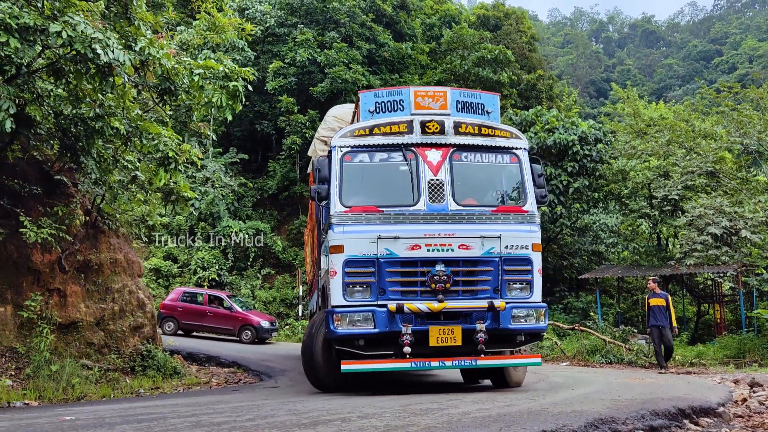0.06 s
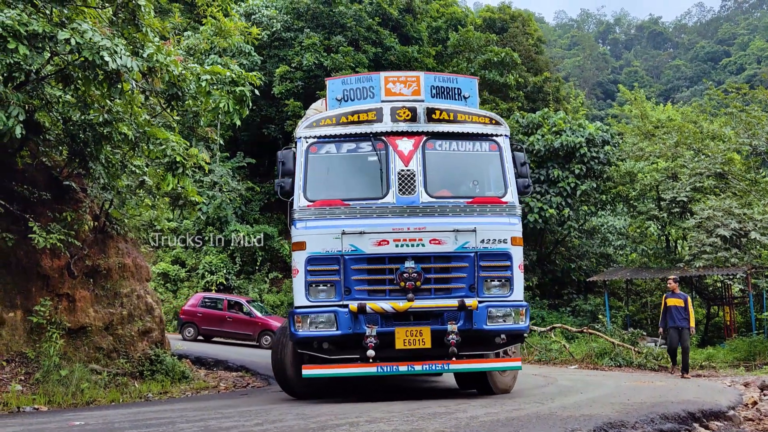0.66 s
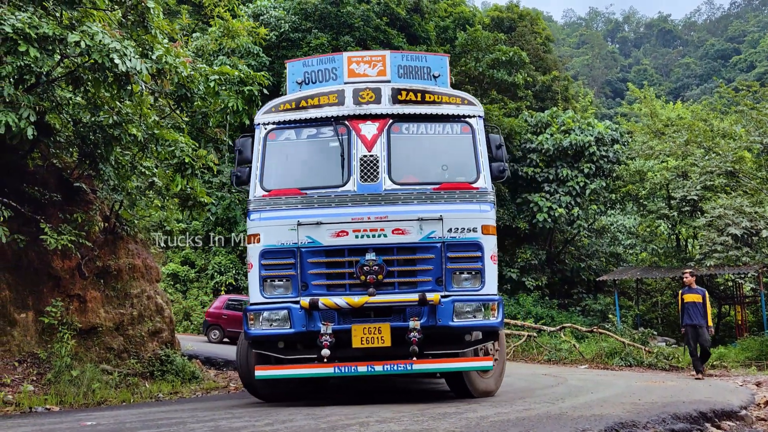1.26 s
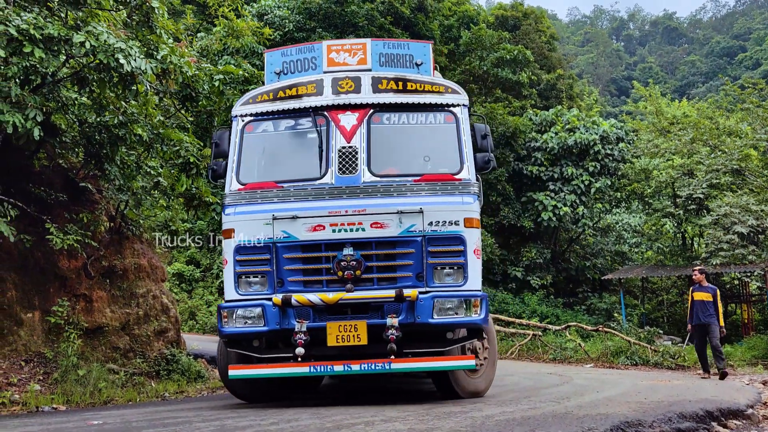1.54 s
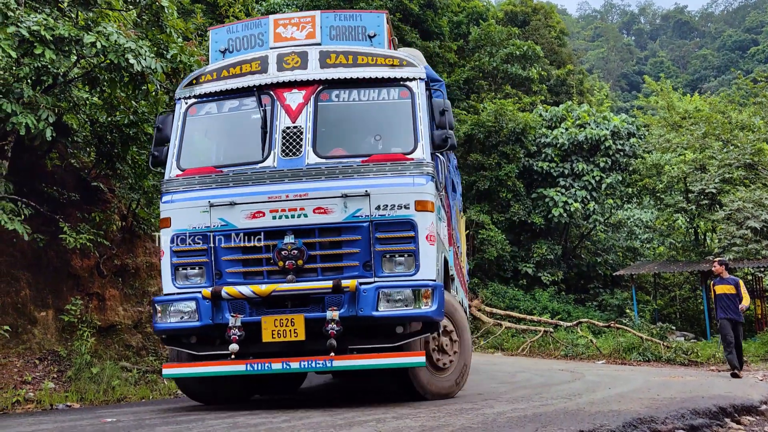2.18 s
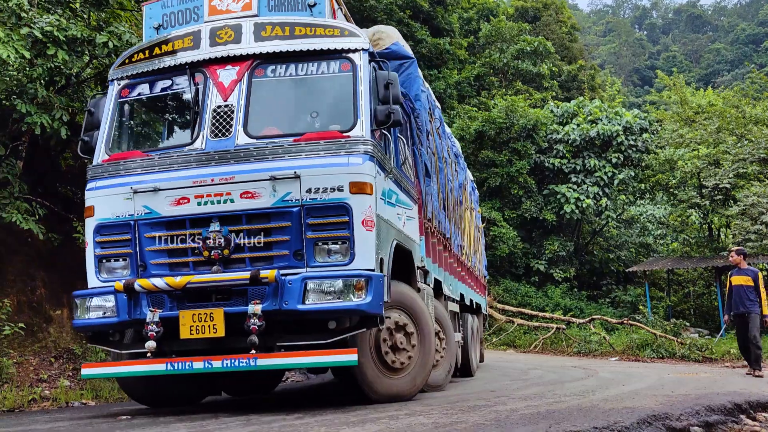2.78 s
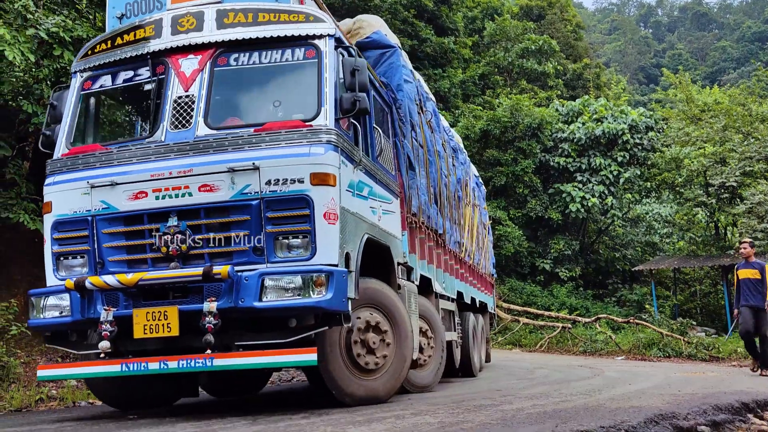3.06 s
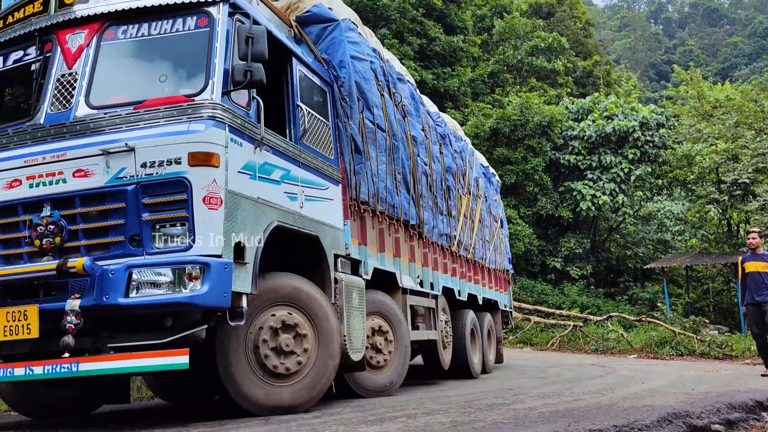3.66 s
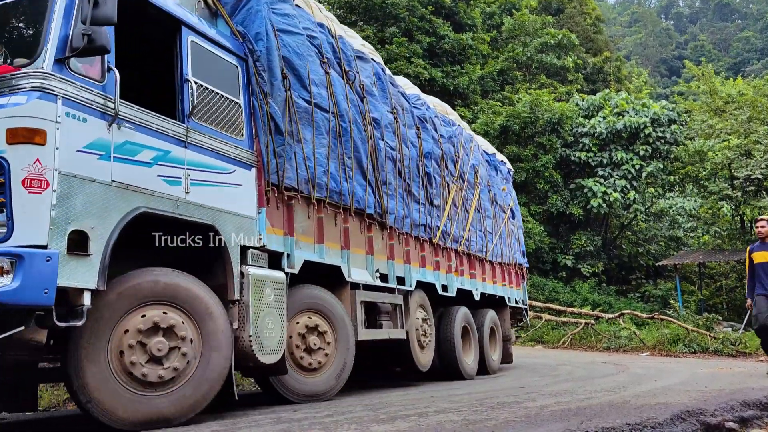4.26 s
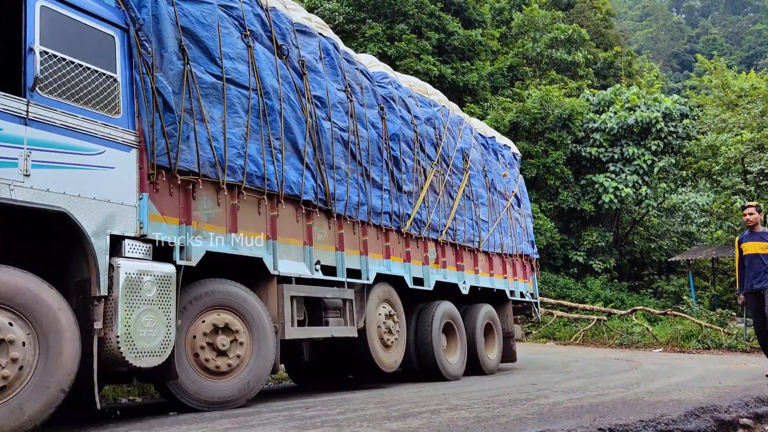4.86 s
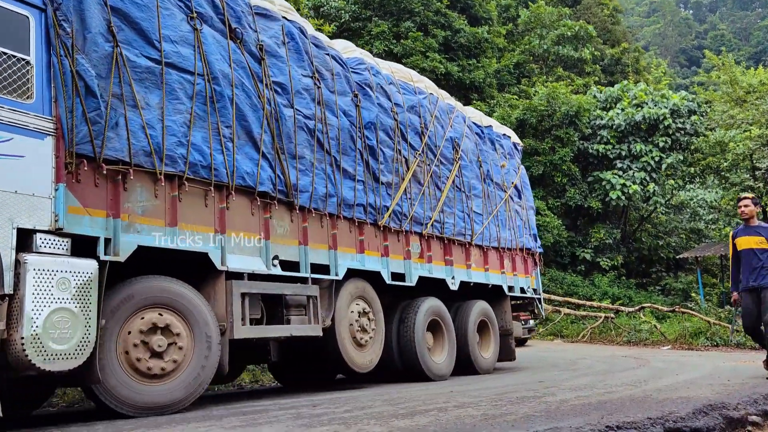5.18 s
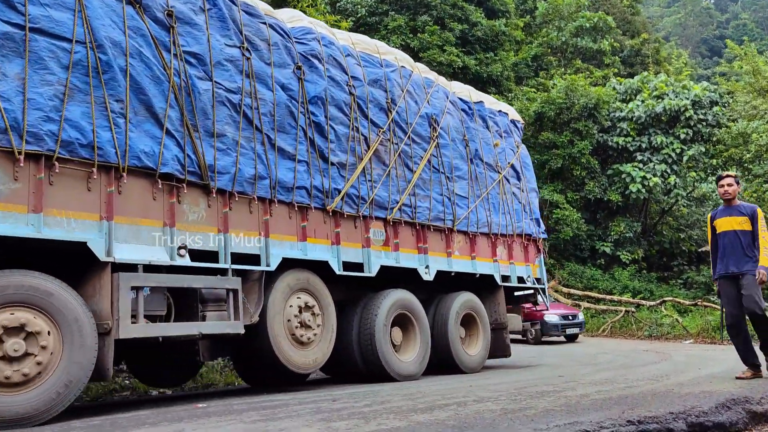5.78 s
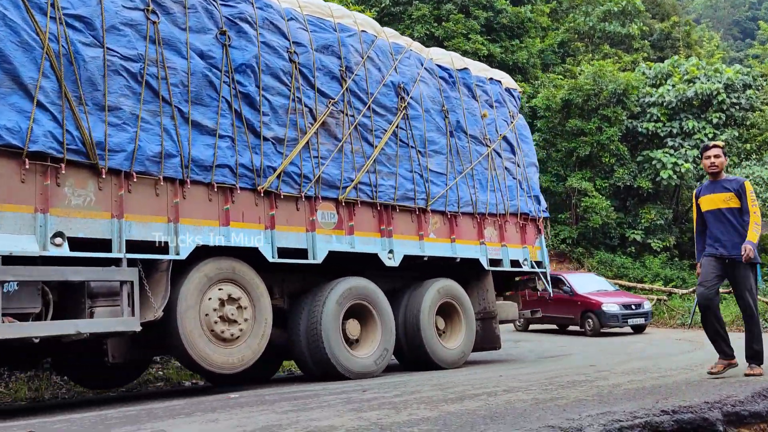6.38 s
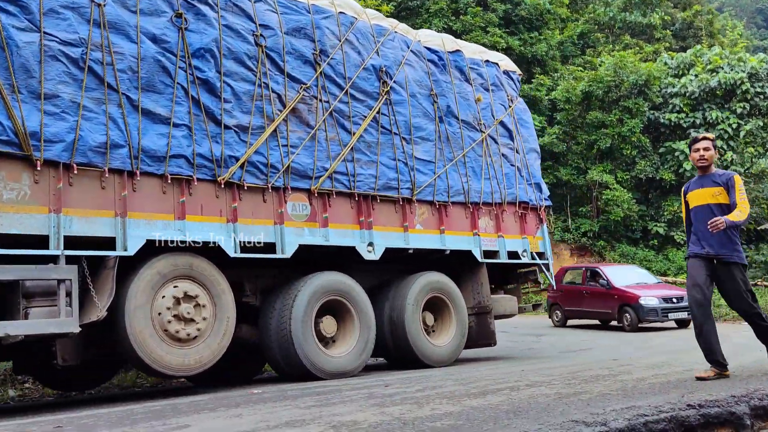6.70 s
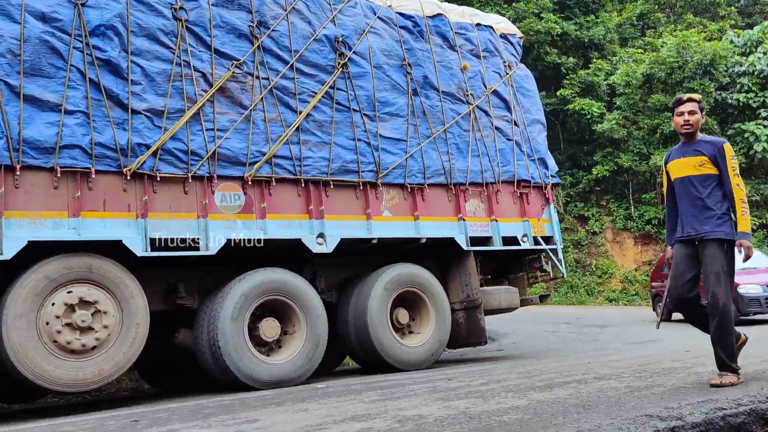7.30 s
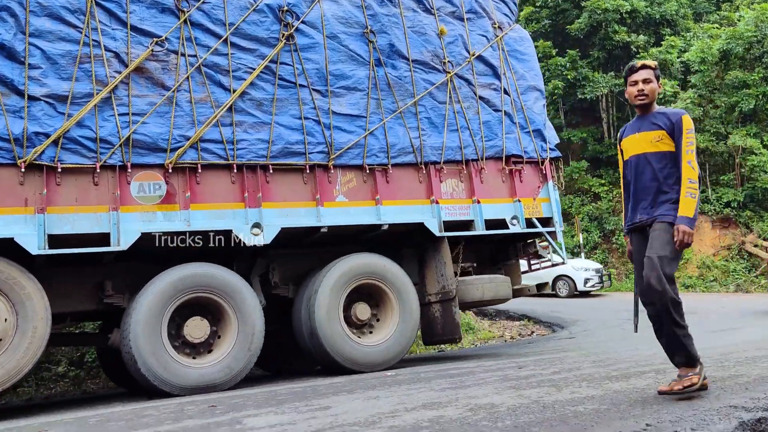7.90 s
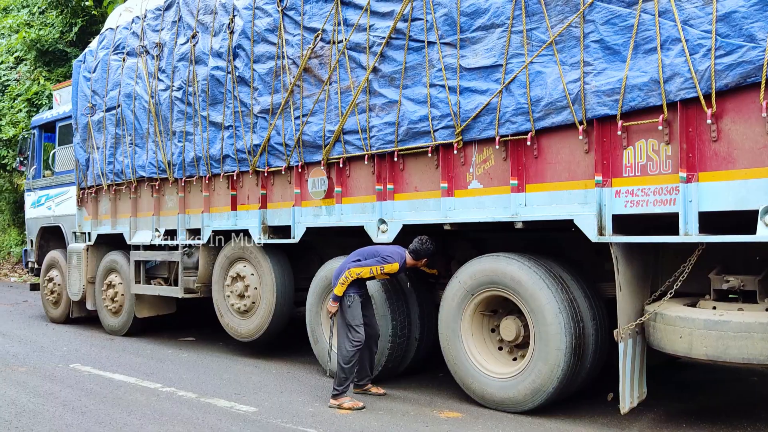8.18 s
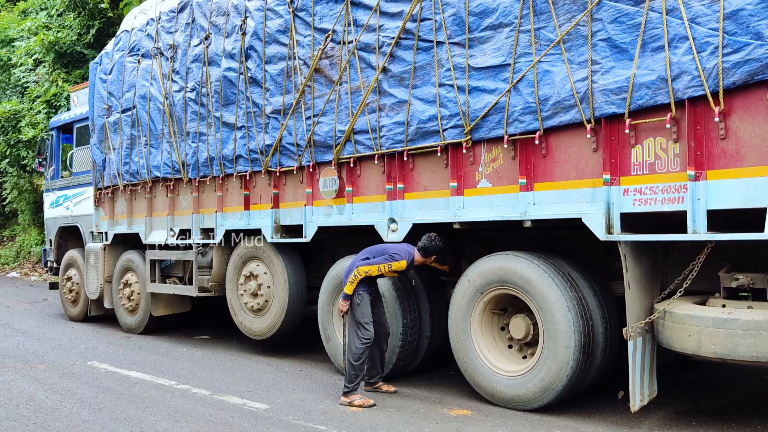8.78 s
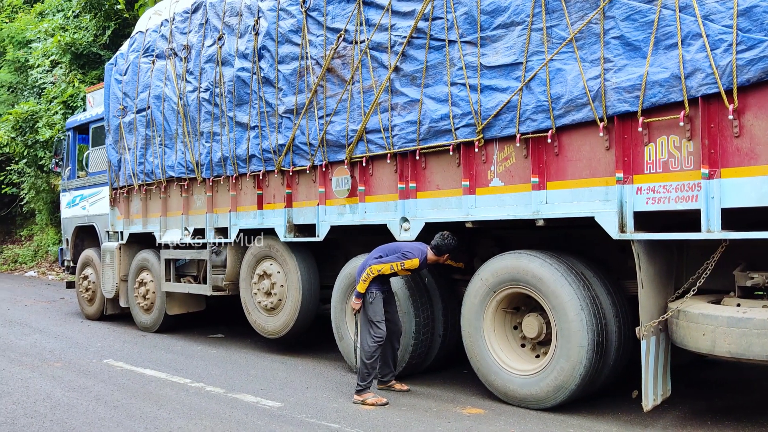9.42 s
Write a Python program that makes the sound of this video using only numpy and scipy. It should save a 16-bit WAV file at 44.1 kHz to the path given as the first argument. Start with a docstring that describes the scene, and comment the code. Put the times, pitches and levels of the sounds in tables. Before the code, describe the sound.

A laden diesel lorry crawls close by on a hill road, its exhaust throbbing and its engine clattering at a steady idle speed. It grows louder as it nears, while air hisses on the left and dragging brakes give thin, very high squeals. After about eight seconds the sound cuts to the lorry standing, heard from behind, idling more quietly. A short two-tone horn toots on the right and echoes off the hillside.

```python
"""Diesel lorry on a hairpin bend

A laden six-cylinder lorry crawls close by at idle speed. Its firings make the exhaust throb and
the engine clatter, and the air compressor chuffs. Air hisses on the left, while dragging brakes
make their drums squeal thinly. Then, all at once, the lorry is heard from behind, standing and
idling, and a two-tone horn toots further along the hill."""
import sys
import numpy as np
from scipy import signal
from scipy.fft import rfft, irfft, next_fast_len
from scipy.io import wavfile
from scipy.ndimage import uniform_filter1d, minimum_filter1d

SR = 44100
rng = np.random.default_rng(int(sys.argv[2]) if len(sys.argv) > 2 else 0)


def dump_mix(stems):
    """Bounce the given channels to the path in sys.argv[1] as a 16-bit WAV at rate SR."""
    frames = np.atleast_2d(stems).T  # one column per channel
    limited = np.clip(frames, -1, 1)  # hard clip at full scale
    pcm = np.round(limited * 32767).astype(np.int16)
    wavfile.write(sys.argv[1], SR, pcm)


N = 416744
T = np.arange(N) / SR
CYLINDERS = 6  # each fires once in an engine cycle
SIDE_ON = np.clip((T - 1.8) / 4.66, 0, 1)  # 0: the lorry faces us, 1: it has turned its side to us

# How often the engine fires: t/s, rate/Hz
FIRING_RATE = [(0.0, 37.54), (2.2, 37.71), (3.5, 37.44), (5.4, 37.58), (6.3, 37.33), (7.6, 37.28),
               (8.1, 38.09), (8.6, 37.19), (9.45, 37.7)]
# Tone colour of the low rumble: f/Hz, relative level/dB
RUMBLE_COLOUR = [(22, -15), (40, 0.5), (70, 3.5), (110, -3), (145, -3.5), (195, 2), (250, -7.5),
                 (320, -14.5), (500, -53)]
# How far to the left the moving lorry sounds: f/Hz, left minus right/dB
ROLLING_BALANCE = [(100, 0), (300, 0), (600, 0), (1100, 3.5), (2000, 7), (2900, 7.5), (4000, 20),
                   (6000, 27), (9000, 36.5)]


def rolling():
    """The lorry creeps past, each part growing louder as it comes near."""
    # Tones of the exhaust and body: multiple of the cycle rate, relative level/dB
    tones = [(4, -24), (16, -6), (20, -8.5), (23, -21), (30, -3), (33, -24), (34, -8.5), (36, -7.5),
             (38, -9.5)]
    # How much sooner the engine and tyres are heard on the right: t/s, lead/s
    right_lead = [(0, -.00009), (2.7, 0), (5, .0001), (6.5, .00027), (8, .00027)]
    drone = exhaust(tones, thump_at=0.477, scatter=0.6, rough=0.05)
    throb = chug() * amp(-8.5) + thump() * amp(-0.2) + drone * amp(-5) + side_drone() * amp(-8)
    rumble = noise(RUMBLE_COLOUR, ROLLING_BALANCE) * amp(-7.5)
    bass = (throb + rumble) * passing(nearest_s=3.87, distance_m=5.1, db=-31)
    bass += boom() * passing(nearest_s=5.2, distance_m=3.3, db=-30.5)
    left, right = bass + tyres() + compressor() + clatter() + engine_block() + belt_whine()
    right = np.interp(T + curve(right_lead), T, right)
    return np.array([left, right]) + air() + brakes()


def standing():
    """The idling lorry from behind: a boom, soft clatter and a faint leak of air."""
    # Tones of the exhaust: multiple of the cycle rate, relative level/dB
    tones = [(5, -14), (7, -15), (9, -24), (10, -14), (12, -9.5), (15, -14), (16, -25), (24, -17),
             (26, -11), (27, -9.5), (28, -15), (30, -7.5), (31, -14), (36, -15), (37, -9.5), (38, -14),
             (39, -22), (40, -11)]
    # Tone colours of the clatter and the leak: f/Hz, relative level/dB
    rattle_colour = [(150, -23), (260, -5.5), (396, -9), (439, -7), (545, -15.5), (731, -9.5), (1030, -9.5),
                     (1300, -9.5), (1590, -16), (2280, -16.5), (2460, -9), (3520, -20.5), (5090, -33),
                     (7150, -56), (12100, -120)]
    leak_colour = [(3000, -27), (4500, -0.5), (5800, -6), (6800, -2), (7500, 2.5), (8600, 3.5),
                   (9500, -4.5), (11000, -11), (14300, -13)]
    # Which side the noises lean to: f/Hz, left minus right/dB
    balance = [(300, -2.5), (600, 3.5), (1100, -2.5), (2000, -3.5), (3000, -12), (5000, -6), (8500, -24),
               (14000, -2)]
    bass = boom() * amp(-35) + exhaust(tones, thump_at=0.45, scatter=0.98, rough=0.25) * amp(-40)
    rumble = noise(RUMBLE_COLOUR, balance) * amp(-43)
    rattle = noise(rattle_colour, balance) * knocking(depth=0.48, decay=0.48) * amp(-41.5)
    leak = noise(leak_colour, balance) * amp(-44)
    return bass + rumble + rattle + leak


def firings():
    """The engine's clock: it counts up by one each time a cylinder fires."""
    return np.cumsum(curve(FIRING_RATE)) / SR + 0.31


def boom():
    """The firings follow each other so fast that they make one deep tone."""
    return unit_level(np.cos(2 * np.pi * firings()))


def exhaust(tones, thump_at, scatter, rough, weak_db=-27):
    """Strong tones line up in a thump, as one cylinder beats harder; weak ones fill in the drone."""
    cycle = firings() / CYLINDERS - thump_at
    strong, drone = dict(tones), np.zeros(N)
    for multiple in range(min(strong), max(strong) + 1):
        if multiple != CYLINDERS:  # boom() plays that tone
            phase = (scatter if multiple in strong else 2 * np.pi) * rng.standard_normal()
            drone += amp(strong.get(multiple, weak_db)) * np.cos(2 * np.pi * multiple * cycle + phase)
    return unit_level(drone * (1 + rough * wander(22)))


def chug(weak_share=0.32, scatter_db=1.5):
    """Strong and weak blasts from the engine's two halves take turns to ring the exhaust pipe."""
    # Notes of the pipe: f/Hz, width/Hz, relative level/dB, sign
    pipe_notes = [(54, 27, 0.5, 1), (107, 42, -2, -1), (177.3, 35, -1, 1)]
    count = firings() - 0.26
    blasts = clicks(count) * np.where(count % 2 < 1, 1, weak_share)
    blasts *= amp(scatter_db * rng.standard_normal(N))
    ring = sum(sign * amp(db) * resonate(blasts, hz, width) for hz, width, db, sign in pipe_notes)
    return unit_level(ring)


def thump(ring_hz=203, length_s=0.0048, tail_s=0.02, front_db=-3):
    """Once a cycle, a harder beat rings the silencer; from the front the cab shields it."""
    since_s = ((firings() + 0.14) % CYLINDERS - 3) / curve(FIRING_RATE)
    beat = np.exp(-(since_s / length_s) ** 2)
    tail = 0.11 * (since_s > 0) * np.exp(-abs(since_s) / tail_s)
    shielding = amp(front_db * (1 - np.sqrt(SIDE_ON)))
    return np.maximum(beat, tail) * np.cos(2 * np.pi * ring_hz * since_s) * shielding


def side_drone():
    """Low tones spread from under the load bed as the lorry turns its side to us."""
    # Tones of the drone: multiple of the cycle rate, relative level/dB
    tones = [(20, -4), (24, 1), (27, -2.5)]
    cycle = firings() / CYLINDERS
    drone = sum(amp(db) * np.cos(2 * np.pi * (multiple * cycle + rng.random())) for multiple, db in tones)
    return SIDE_ON * unit_level(drone)


def knocking(depth, decay):
    """A level that jumps at each firing, then fades; decay is a share of the gap between firings."""
    # Knock of each cylinder, in firing order: relative level/dB
    knock_db = [1, -1.5, 4, -1, -1, 4.5]
    count = firings() + 0.067
    strength = amp(np.take(knock_db, count.astype(int), mode="wrap"))
    bursts = strength * np.exp(-(count % 1) / decay)
    return unit_level(1 + depth * uniform_filter1d(bursts, size=240))


def clatter(grain_db=-0.1, surge_db=1.32):
    """The knocks of burning fuel rattle the engine's casing."""
    # Tone colour of the casing from the front and the side: f/Hz, relative level/dB
    front_colour = [(290, -7), (350, -4), (520, -2), (620, 0), (780, -3), (950, -3), (1200, 2),
                    (1330, -8.5), (1600, 1), (2200, -1), (2750, -1), (3100, -2.5), (3900, -12.5)]
    side_colour = [(290, -3.5), (350, -3.5), (460, -1), (620, 2.5), (850, 1), (1150, 6), (1400, 3.5),
                   (1620, 3.5), (2200, -2), (2800, 2.5), (3300, -3), (4200, -15)]
    uneven = amp(grain_db * np.tanh(wander(240)) + surge_db * wander(25))
    rattle = turning(front_colour, side_colour) * knocking(depth=0.51, decay=0.6)
    return rattle * uneven * passing(nearest_s=5.16, distance_m=3.88, db=-34.5)


def engine_block(scatter_db=1.5, rattle_db=4):
    """Each firing strikes the metal block a sharp blow, and loose parts rattle after it."""
    # Notes of the block: f/Hz, width/Hz, relative level from the front/dB, from the side/dB
    block_notes = [(1029, 64, 2.5, 2.5), (1115, 73, 1.5, 4), (1191, 84, -3.5, 5), (1530, 270, 0, 0),
                   (2730, 230, -2, -14)]
    blows = clicks(firings() + 0.09) * amp(scatter_db * rng.standard_normal(N))
    rattle = noise([(500, 0), (2500, 0)], ROLLING_BALANCE) * knocking(depth=0.92, decay=0.21)
    out = np.zeros((2, N))
    for hz, width, front_db, side_db in block_notes:
        struck = unit_level(resonate(blows * np.sign(rng.standard_normal(N)), hz, width))
        shaken = unit_level(resonate(rattle, hz, width))
        ring = pan(at_pitch(ROLLING_BALANCE, hz)) * struck + amp(rattle_db) * shaken
        out += amp(front_db + (side_db - front_db) * SIDE_ON) * ring
    return unit_level(out) * passing(nearest_s=2.76, distance_m=2.2, db=-38)


def compressor(ring_hz=454, width_hz=23, rough=0.28, hum_multiple=37):
    """One gulp of air per engine turn rings the intake pipe; a hum carries on along the side."""
    # The intake swings away: front level/dB, hidden level/dB, halfway t/s, time taken/s
    intake_swing = (-41.5, -57.5, 2.45, 1.8)
    front_db, hidden_db, halfway_s, taken_s = intake_swing
    hidden = np.clip((T - halfway_s) / taken_s + 0.5, 0, 1)
    turns = firings() / (CYLINDERS / 2) + 0.3
    puffs = np.exp(-(turns % 1)) * rng.standard_normal(N)
    ring = unit_level(resonate(clicks(turns), ring_hz, width_hz))
    breath = unit_level(resonate(puffs, ring_hz, 2 * width_hz))
    chuff = unit_level(ring + rough * breath) * amp(front_db + (hidden_db - front_db) * hidden)
    hum = unit_level(np.sin(2 * np.pi * hum_multiple * turns))
    return pan(3.8) * (chuff + hum * passing(nearest_s=4.9, distance_m=1, db=-53))


def air(flutter_db=1.45, grain_db=0.5):
    """Air hisses under the lorry, fluttering a little and now and then spitting."""
    # Tone colours of the hiss (front, side) and the high sizzle: f/Hz, relative level/dB
    front_colour = [(2500, -22), (3300, -2), (4000, -1.5), (4600, 2), (5000, 1.5), (5900, 4), (6800, 0),
                    (7500, 2), (8300, -2), (9200, 0), (11000, -5), (14000, -5.5)]
    side_colour = [(2200, -14.5), (3200, -5.5), (4350, 0.5), (4600, 2.5), (4900, -4), (5900, 2), (6800, -1),
                   (7500, 2), (8300, 2.5), (9500, 4.5), (11000, -0.5), (14000, -46)]
    sizzle_colour = [(8500, -29), (9300, -7), (9900, 7.5), (11200, 7.5), (12300, 3), (13200, -2),
                     (14300, -7.5)]
    # Loudness of the sizzle: t/s, level/dB
    sizzle_level = [(0, -32.5), (.6, -35.5), (.8, -31), (1.15, -35), (2, -31), (2.5, -34), (3.5, -33),
                    (4.4, -35.5), (5.7, -38.5), (7.3, -34.5), (8, -35)]
    # Spits of air: t/s, level/dB, fade time/s
    spit_list = [(0.415, -30, 0.0092), (1.899, -31, 0.0035), (3.966, -24, 0.024), (4.97, -23.5, 0.027),
                 (5.812, -23, 0.0078), (5.97, -24, 0.033)]
    hiss = turning(front_colour, side_colour) * knocking(depth=0.36, decay=0.31)
    hiss *= passing(nearest_s=6.73, distance_m=3.07, db=-28)
    sizzle = noise(sizzle_colour, ROLLING_BALANCE) * amp(curve(sizzle_level))
    spits = sum(amp(db) * (T > start) * np.exp(-abs(T - start) / fade) for start, db, fade in spit_list)
    spray = noise([(3000, 4.8), (6000, 7.1), (14000, 2.0)], ROLLING_BALANCE)
    flutter = amp(flutter_db * wander(22.7) + grain_db * wander(270))
    return (hiss + sizzle) * flutter + spits * spray


def brakes(waver_hz=24, flutter_db=5.5, sag_hz=70, rasp=0.1, grit=0.12, gain_db=-1.5, echo_db=-11):
    """Dragging linings ring one high note of the drums after another; each sags at its loudest."""
    # Squeals: t/s, length/s, loudest point/share of length, f/Hz, glide/Hz, relative level/dB
    squeals = [(0.48, 0.085, 0.5, 12700, 352, -27), (0.72, 0.16, 0.63, 10270, 26, -17),
               (0.77, 0.27, 0.21, 9600, -92, -23), (1, 0.08, 0.5, 11230, -50, -22),
               (1.34, 0.11, 0.45, 13420, 30, -29), (1.78, 0.076, 0.69, 12400, 350, -20),
               (1.8, 0.16, 0.73, 10590, -120, -12), (1.97, 0.2, 0.43, 10620, -120, -10.5),
               (2.34, 0.18, 0.5, 13990, 20, -28), (3.01, 0.23, 0.58, 8640, 70, -26.5),
               (3.17, 0.16, 0.3, 14000, -10, -28.0), (3.2, 0.23, 0.37, 9470, 50, -27),
               (3.48, 0.071, 0.44, 12400, 350, -12), (3.57, 0.05, 0.4, 14000, -290, -20),
               (3.61, 0.15, 0.93, 13750, -40, -18), (4.4, 0.098, 0.36, 12450, 220, -11),
               (4.42, 0.18, 0.64, 13000, -220, -18), (4.56, 0.071, 0.88, 12750, 154, -6),
               (4.65, 0.1, 0.18, 13730, 20, -18), (4.78, 0.26, 0.44, 9650, -100, -20.5),
               (5.44, 0.084, 0.26, 12230, 172, -12), (5.46, 0.17, 0.72, 9180, 124, -21.5),
               (5.485, 0.045, 0.36, 12740, 353, -16), (5.51, 0.055, 0.3, 13540, 20, -19),
               (5.565, 0.048, 0.8, 14100, -350, -15), (5.6, 0.087, 0.65, 13800, -7, -6),
               (5.61, 0.075, 0.49, 13200, 40, -16), (5.67, 0.22, 0.69, 9500, 200, -30),
               (5.79, 0.046, 0.5, 8650, -58, -22.5), (5.85, 0.13, 0.65, 9860, -130, -18),
               (6.26, 0.045, 0.5, 12170, 40, -9), (6.32, 0.11, 0.4, 13180, 248, -21),
               (6.38, 0.07, 0.87, 13890, 100, -22), (6.38, 0.11, 0.18, 9180, 132, -18.5),
               (6.445, 0.064, 0.3, 13600, -130, -11.0), (6.48, 0.12, 0.7, 9450, 280, -22),
               (6.57, 0.065, 0.74, 8750, 40, -15), (6.66, 0.11, 0.4, 9840, 68, -20),
               (7.05, 0.15, 0.5, 12610, -250, -24), (7.07, 0.096, 0.42, 9990, 40, -19),
               (7.19, 0.067, 0.46, 10680, 70, -20), (7.2, 0.06, 0.45, 9780, 60, -15),
               (7.22, 0.084, 0.36, 9960, 170, -17), (7.26, 0.07, 0.5, 9350, -120, -22),
               (7.41, 0.071, 0.6, 9550, 60, -20), (7.24, 0.14, 0.6, 13940, -120, -28),
               (7.36, 0.085, 0.4, 13220, 350, -22.5), (7.4, 0.12, 0.46, 13880, 350, -25),
               (7.53, 0.22, 0.22, 9950, -360, -19), (7.79, 0.07, 0.3, 12600, 352, -24.5),
               (7.93, 0.07, 0.5, 12520, 23, -25), (7.96, 0.05, 0.8, 9800, 15, -14.5)]
    out = singing_brake()
    waver, grip, scrape, grains = wander(39), wander(58), wander(310), wander(900)
    for start, length, peak, centre_hz, glide_hz, db in squeals + nearby_notes(squeals):
        now = np.flatnonzero((T > start) & (T < start + length))
        own = (now + rng.integers(N)) % N  # each squeal gets its own stretch of the wobbles
        progress = (T[now] - start) / length
        swell = np.sqrt(np.interp(progress, [0, peak, 1], [0, 1, 0]))
        hz = centre_hz + glide_hz * (progress - 0.5) + sag_hz * (0.8 - swell) + waver_hz * waver[own]
        tone = np.sqrt(2) * np.sin(2 * np.pi * np.cumsum(hz) / SR + rasp * scrape[own])
        ragged = 1 + grit * grains[own]
        out[now] += amp(db + gain_db + flutter_db * np.tanh(grip[own])) * swell * ragged * tone
    echo = amp(echo_db) * hillside(out, fade_s=0.38)
    return out * amp([[0], [-31]]) + echo * amp([[0], [-21]])  # both far to the left


def nearby_notes(squeals, spread_hz=520, weaker_db=-11, length_s=0.052):
    """Somewhere along the way, each squeal briefly wakes a nearby note of the brake drum."""
    chances = rng.random((len(squeals), 2))
    return [(start + when * length, length_s, 0.5, hz + spread_hz * (2 * pitch - 1), 0, db + weaker_db)
            for (start, length, _, hz, _, db), (when, pitch) in zip(squeals, chances)]


def singing_brake(waver_hz=36, flutter_db=7, gain_db=-1, fade_s=0.046):
    """One lining sings a thin, unsteady note that sags and climbs as the drum goes round."""
    # Path of the note: t/s, f/Hz, relative level/dB
    note = [(0.18, 9840, -41), (0.53, 10040, -38), (0.77, 9750, -30), (1.07, 9280, -37),
            (1.38, 9130, -27.5), (1.91, 10130, -35), (2.24, 9950, -25.5), (2.42, 10009, -31)]
    fade = np.clip(np.minimum(T - note[0][0], note[-1][0] - T) / fade_s, 0, 1)
    hz = curve(note) + waver_hz * wander(51)
    tone = np.sqrt(2) * np.sin(2 * np.pi * np.cumsum(hz) / SR)
    return fade * tone * amp(curve(note, column=2) + gain_db + flutter_db * np.tanh(wander(47)))


def frame_knocks(width_share=0.42, rattle_db=-15):
    """The lorry's frame gives dry cracks, each followed by a short rattle."""
    # Knocks: t/s, peak level/dB, f/Hz, fade time/s, left minus right/dB
    knock_list = [(2.77, -20, 2110, .005, 9), (2.896, -14, 5500, 0.003, 22), (2.901, -12, 6500, 0.004, 26),
                  (2.907, -19, 2400, 0.004, 10), (7.7052, -15.5, 1300, 0.011, 5),
                  (8.522, -23.5, 6540, 0.025, -15)]
    out = np.zeros((2, N))
    for start, db, hz, fade_s, side_db in knock_list:
        crack = resonate(clicks(1.0 * (T > start)), hz, width_share * hz)
        rattle = unit_level(resonate(rng.standard_normal(N), hz, width_share * hz))
        rattle *= (T > start) * np.exp(-abs(T - start) / fade_s)
        out += pan(side_db) * amp(db) * (crack / abs(crack).max() + amp(rattle_db) * rattle)
    return out


def horn(bell_hz=2800, bell_width_hz=80, swell_s=0.022, rasp=0.15, echo_delay_s=0.06):
    """A short, raspy toot from a moving vehicle; the hill throws it back blurred and a bit higher."""
    # The horn's two notes and their overtones: f/Hz, relative level/dB
    tones = [(350, -44), (403, -46), (2456, -39), (2806, -29.5), (2850, -44), (3157, -46), (3225, -41.5),
             (3628, -41.5)]
    loudness = np.interp(T, [8.964, 8.978, 9.095, 9.145], [0.015, 0.8, 0.83, 0])

    def toot(pitch_ratio, waver):
        """Tones near the note at which the horn's bell rings are the slowest to swell."""
        clock = pitch_ratio * np.cumsum(1 + waver * wander(130)) / SR
        out = np.zeros(N)
        for hz, db in tones:
            late_s = swell_s / (1 + ((hz - bell_hz) / bell_width_hz) ** 2)
            swell = np.minimum(loudness, np.interp(T - late_s, T, loudness))
            out += swell * np.sqrt(2) * amp(db) * np.sin(2 * np.pi * hz * clock)
        return out * (1 + rasp * wander(110))

    near = toot(pitch_ratio=1, waver=0.0034)
    far = np.roll(toot(pitch_ratio=1.028, waver=0.0075), int(echo_delay_s * SR))
    echoes = amp(-9) * hillside(near, fade_s=0.39) + amp(-8) * hillside(far, fade_s=0.71)
    return pan(-14.5) * amp(-1) * (near + echoes)


def belt_whine(waver_hz=26, flutter_db=4):
    """The fan belt whines once the cab has gone by; its note flutters with the firings."""
    # Path of the note: t/s, f/Hz, level/dB
    note = [(5.8, 1160, -77), (6.7, 1185, -40), (7.2, 1181, -38), (8, 1157, -46)]
    cycles = np.cumsum(curve(note) + waver_hz * wander(91)) / SR
    tone = unit_level(np.sin(2 * np.pi * cycles) * knocking(depth=3.3, decay=0.6))
    return tone * amp(curve(note, column=2) + flutter_db * np.tanh(wander(35.4)))


def tyres():
    """Tyres roll on the road with a low rush, loudest as the rear wheels come close."""
    # Loudness of the tyres: t/s, level/dB
    tyre_level = [(0, -47), (5.6, -65), (6.6, -42), (7.4, -43), (8, -42.5)]
    rush = noise([(230, -5.5), (350, -2), (410, -5.0), (520, -7.5)], ROLLING_BALANCE)
    return rush * amp(curve(tyre_level))


def hillside(sound, fade_s):
    """Scattered echoes from the road, the bank and the trees, dying by 60 dB in fade_s."""
    t = T[:SR // 2]
    tail = rng.standard_normal((2, len(t))) * amp(-60 * t / fade_s)
    return signal.fftconvolve(sound[None], tail / np.linalg.norm(tail[0]), axes=1)[:, :N]


def passing(nearest_s, distance_m, db, speed_m_per_s=1.297):
    """Level of a part that creeps by in a straight line: it falls with distance."""
    return amp(db) * distance_m / np.hypot(distance_m, speed_m_per_s * (T - nearest_s))


def turning(front_colour, side_colour):
    """Noise whose tone colour changes as the lorry turns its side to us."""
    front = np.sqrt(1 - SIDE_ON) * noise(front_colour, ROLLING_BALANCE)
    return front + np.sqrt(SIDE_ON) * noise(side_colour, ROLLING_BALANCE)


def noise(colour, balance):
    """Stereo noise shaped by (f/Hz, level/dB) rows; its sides match in the bass, not in the treble."""
    # How alike left and right are: f/Hz, likeness from 0 to 1
    likeness = [(100, 0.9), (300, 0.94), (550, 0.83), (1100, 0.5), (2000, 0.13), (4000, 0.13), (12000, 0)]
    hz = np.fft.rfftfreq(N, 1 / SR)
    left, unrelated = rfft(rng.standard_normal((2, N)))
    alike = np.clip(at_pitch(likeness, hz), -1, 1)
    pair = np.array([left, alike * left + np.sqrt(1 - alike ** 2) * unrelated])
    low_hz, high_hz = colour[0][0] / 2, colour[-1][0] * 2
    band = 1 / (1 + (hz / high_hz) ** 8) / (1 + (low_hz / (hz + 1)) ** 8)
    return unit_level(irfft(pair * pan(at_pitch(balance, hz)) * amp(at_pitch(colour, hz)) * band, N))


def resonate(sound, hz, width_hz):
    """Makes a sound ring at one pitch; filtering twice shuts out more of the rest."""
    b, a = signal.iirpeak(min(hz, SR / 3), hz / width_hz, SR)
    return signal.lfilter(b, a, signal.lfilter(b, a, sound))


def wander(rate_hz):
    """A random wobble of typical size 1, up to about the given rate."""
    size = next_fast_len(N, True)
    hz = np.fft.rfftfreq(size, 1 / SR)
    spectrum = rfft(rng.standard_normal(size)) * (hz > 0) / (1 + (hz / rate_hz) ** 4)
    return unit_level(irfft(spectrum, size)[:N])


def clicks(count):
    """A single click at each whole count."""
    return np.diff(np.floor(count), prepend=np.floor(count[0]))


def curve(rows, column=1):
    """One column of a table, joined by straight lines in time."""
    rows = np.array(rows)
    return np.interp(T, rows[:, 0], rows[:, column])


def at_pitch(rows, hz):
    """Looks up a table by frequency, with octaves about evenly spaced."""
    row_hz, values = np.transpose(rows)
    return np.interp(np.log(hz + 1), np.log(row_hz + 1), values)


def pan(side_db):
    """Left and right gains that average 1; above 0 dB leans left."""
    ratio = np.atleast_1d(amp(side_db))
    return np.array([2 * ratio, np.full_like(ratio, 2)]) / (1 + ratio)


def unit_level(sound):
    """Scales a sound so that the average of its channels has a typical size (rms) of 1."""
    return sound / np.sqrt(np.mean(np.atleast_2d(sound).mean(0) ** 2) + 1e-20)


def amp(db):
    """Turns decibels into a gain."""
    return 10 ** (np.asarray(db) / 20)


def scene(change_s=8.012, fade_s=0.0039):
    """The lorry rolls past; then it is suddenly heard standing, and the horn toots."""
    behind = np.clip((T - change_s) / fade_s + 0.5, 0, 1)
    return (1 - behind) * rolling() + behind * (standing() + horn()) + frame_knocks()


def record(dry, ceiling=0.88, top_hz=14350):
    """A quick limiter holds down the loudest peaks, then the highest treble is cut off."""
    allowed = ceiling / np.maximum(abs(dry).max(0), ceiling)
    limited = dry * uniform_filter1d(minimum_filter1d(allowed, size=200), size=200)
    treble_cut = signal.firwin(701, top_hz, window=("kaiser", 9), fs=SR)
    return signal.oaconvolve(limited, treble_cut[None], "same")


dry = scene()
out = record(dry)
dump_mix(out)
```